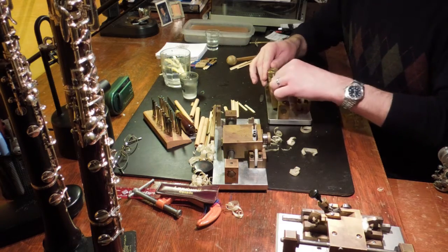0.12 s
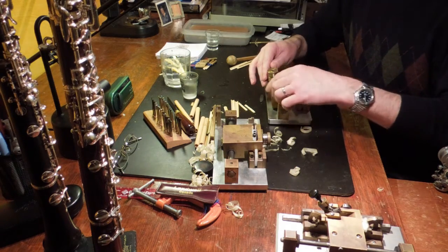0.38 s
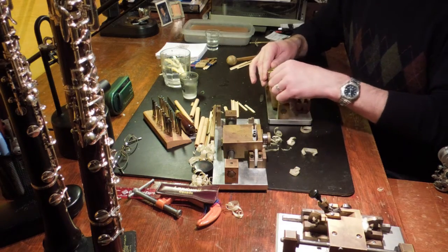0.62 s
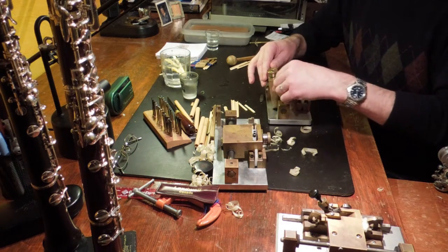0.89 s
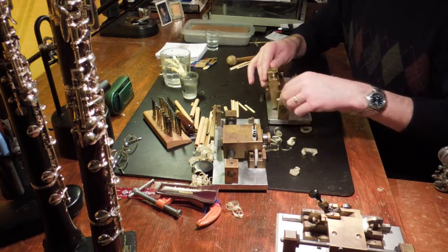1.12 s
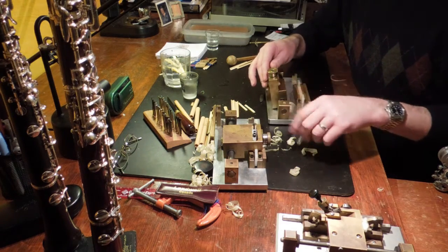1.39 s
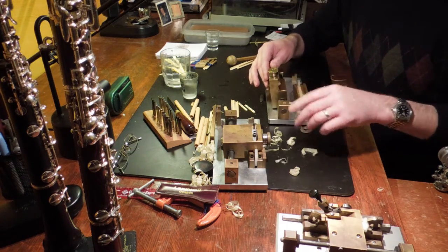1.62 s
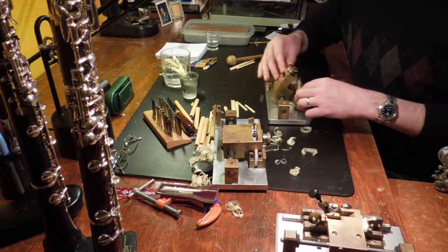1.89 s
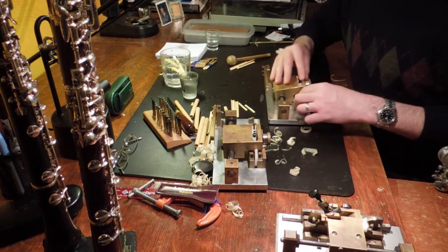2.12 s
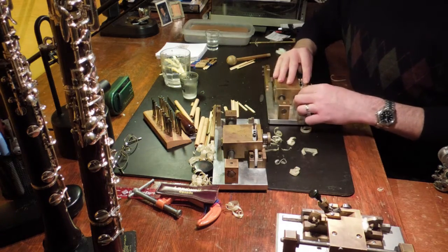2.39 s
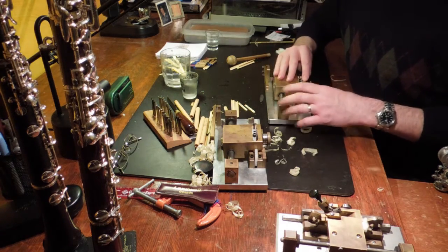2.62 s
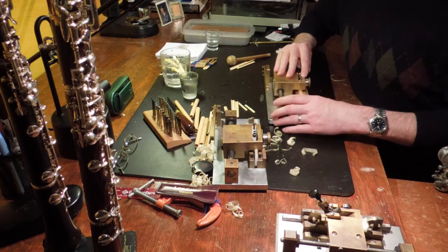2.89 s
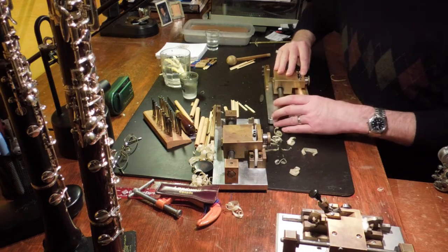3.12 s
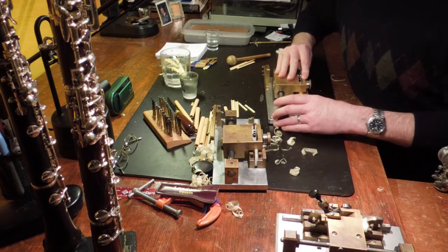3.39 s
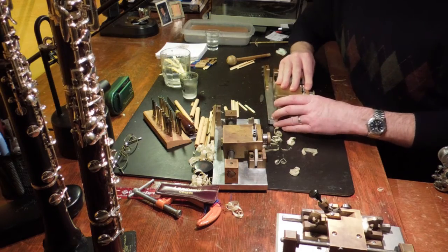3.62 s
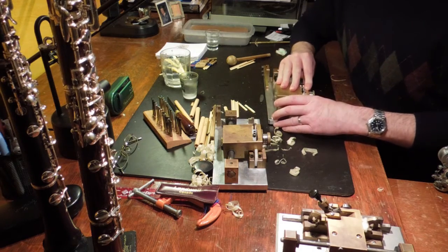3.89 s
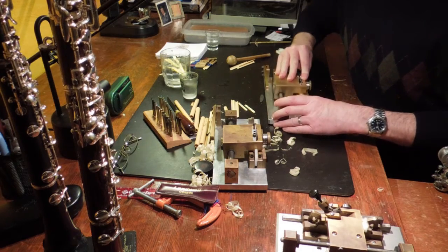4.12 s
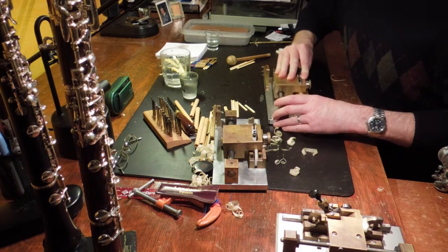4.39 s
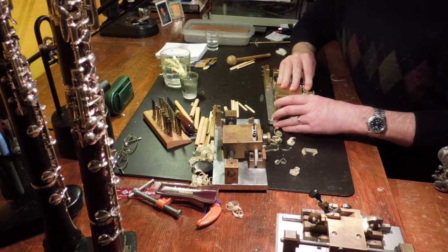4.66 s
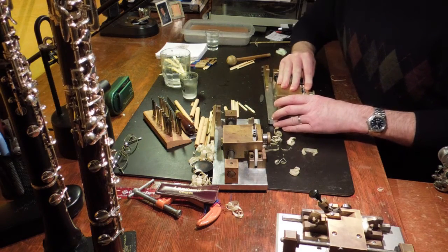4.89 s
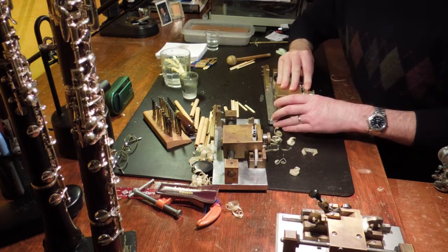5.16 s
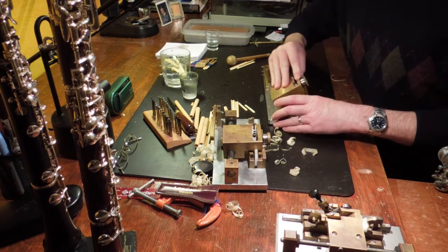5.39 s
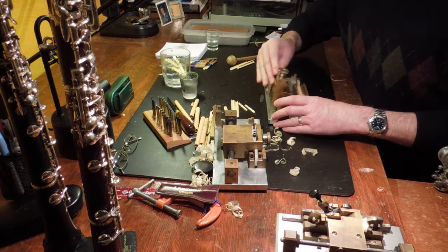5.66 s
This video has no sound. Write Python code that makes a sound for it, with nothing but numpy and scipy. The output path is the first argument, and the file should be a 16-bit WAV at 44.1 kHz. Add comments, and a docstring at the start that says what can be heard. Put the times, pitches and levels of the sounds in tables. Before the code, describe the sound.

Close view of a workbench in a quiet room with low rumble and microphone hiss. Fingers rustle faintly on cane and brass, with dull table bumps and tiny clicks. Then a gouging carriage is pushed three times, each stroke a short hiss with hollow rumble, ending in a sharp click or woody knock. The second ends in a brief piercing squeal. One last loud crack of brass closes the action.

```python
"""A quiet workshop throughout: low room rumble, faint wavering hum tones and microphone hiss. Over it fingers
rustle on cane and brass (bursts of tiny grains), with dull bumps through the table and small brass clicks.
A hand-worked cane gouger follows: its carriage is pushed along its rod three times. It hisses and rumbles
(shaped grains), clicks and knocks (ringing modes), and once squeals (stick-slip overtones).
Nearby surfaces echo the clicks, knocks and squeal, and a dense tail follows them."""
import sys
import numpy as np
from scipy import signal
from scipy.io import wavfile
from scipy.ndimage import uniform_filter1d

SR = 44100
rng = np.random.default_rng(int(sys.argv[2]) if len(sys.argv) > 2 else 0)


def waveform_to_disk(signal):
    """Save audio, clipped to [-1, 1], as 16-bit WAV at the path in sys.argv[1]."""
    frames = np.transpose(np.atleast_2d(signal))
    scaled = np.clip(frames, -1, 1) * 32767
    samples = np.round(scaled).astype(np.int16)
    wavfile.write(sys.argv[1], SR, samples)


def volts(x):
    """Linear amplitude factor 10**(x/20) for a level x in dB, scalar or array-like."""
    e = np.asarray(x, float) / 20
    return 10 ** e


N = 254412  # samples


def rms_one(x):
    """Scale to rms 1."""
    return x / np.sqrt(np.mean(x ** 2) + 1e-20)


def at_hz(points, hz):
    """Read a curve of (f/Hz, value) on a log frequency axis."""
    points_hz, values = np.array(points).T
    return np.interp(np.log(hz), np.log(points_hz), values)


def band(x, low_hz, high_hz):
    """Let through only the pitches between two limits (Butterworth band-pass)."""
    limits = [low_hz, min(high_hz, .48 * SR)]
    return signal.sosfilt(signal.butter(2, limits, "band", fs=SR, output="sos"), x)


def drift(rate_hz):
    """Slow chance of spread 1: smoothed noise, made on every 20th sample and joined by lines."""
    r = np.exp(-40 * np.pi * rate_hz / SR)
    noise = rng.standard_normal(N // 20 + 2002)
    slow = signal.lfilter([1], [1, -2 * r, r * r], noise)[2000:]
    return np.interp(np.arange(N) / 20, np.arange(len(slow)), rms_one(slow))


def ring(force, hz, t60):
    """One vibrating mode: a unit click sets a sine of height 1 ringing, 60 dB weaker after t60 seconds."""
    r, w = volts(-60 / (t60 * SR)), 2 * np.pi * hz / SR
    return signal.lfilter([0, np.sin(w)], [1, -2 * r * np.cos(w), r * r], force + 1e-18)


def stereo(mid, side, alike):
    """Mix two independent noises into left and right with a given likeness (1 = the same)."""
    return np.sqrt(1 + alike) * mid + np.sqrt(1 - alike) * side * [[1], [-1]]


def coloured(spectrum, source, likeness, low_hz):
    """Third-octave bands of a stereo source, each with its level and left-right likeness; rms 1."""
    out, edges = 0, low_hz * 2 ** np.arange(0, np.log2(17000 / low_hz), 1 / 3)
    for k, (low, high) in enumerate(zip(edges, edges[1:])):
        mid, side = band(source[k % 2], low, high)
        centre = np.sqrt(low * high)
        alike = np.clip(at_hz(likeness, centre), 0, 1)
        out = out + volts(at_hz(spectrum, centre)) * stereo(mid, side, alike)
    return rms_one(out)


def grains(per_s, spread_db, shape):
    """Dense uneven clicks at random moments, rms 1."""
    sizes = volts(spread_db * np.minimum(rng.exponential(1, shape), 5)) * rng.choice([-1, 1], shape)
    return rms_one(sizes * (rng.random(shape) < per_s / SR))


# colour of the background noise: (f/Hz, relative level per Hz/dB)
FLOOR_COLOUR = [(12, -33), (20, 2.5), (54, -1.5), (206, -11.5), (270, -4), (328, -28.5), (365, -10),
                (494, -17), (536, -22), (582, -18.5), (832, -22.5), (1610, -24.5), (6150, -30.5),
                (12500, -28), (14000, -28.5)]
# how alike its left and right are: (f/Hz, likeness from 0 to 1)
FLOOR_LIKENESS = [(60, 0.96), (180, 0.91), (540, 0.53), (1630, 0.25), (4920, 0.065), (14800, 0.062)]
# faint tones that waver in level: (f/Hz, typical rms level/dB)
HUM_TONES = [(268, -60), (10740, -70.5), (12182, -74)]


def floor():
    """Room rumble alike in both ears, microphone hiss nearly unrelated, faint tones that waver in level."""
    noise = coloured(FLOOR_COLOUR, rng.standard_normal((2, 2, N)), FLOOR_LIKENESS, low_hz=20.005)
    t = np.arange(N) / SR
    tones = 0
    for hz, level_db in HUM_TONES:
        peak = volts(level_db + 3 + 2 * drift(6))  # a sine peaks 3 dB above its rms
        tones = tones + peak * np.sin(2 * np.pi * hz * t)
    return volts(-45.5) * noise + tones


# colour of rough surfaces rubbing: (f/Hz, relative level per Hz/dB)
HISS_COLOUR = [(2350, -32), (4000, -20.5), (7460, -11.5), (8970, -9), (10100, -19), (13100, 9.5),
               (14000, -5)]


def rubbing_hiss():
    """Rough skin, cane and blade scrape as many tiny grains: a bright hiss, stronger on the right."""
    likeness = [(4000, 1.0), (14000, 0.24)]  # (f/Hz, left-right likeness)
    hiss = coloured(HISS_COLOUR, grains(9000, 2.7, (2, 2, N)), likeness, low_hz=3200)
    return hiss * volts([[-1.2], [1.2]])


# fingers and cane rubbing, one row a brush:
# (peak t/s, treble level/dB, rise t/s, fall t/s, middle band level against treble/dB)
BRUSHES = [(0.306, -53.5, .04, 0.11, -14), (0.448, -54.5, 0.064, .08, -23), (0.80, -51, 0.054, .2, -21),
           (1.001, -39.5, 0.058, 0.068, -11), (1.07, -42.5, 0.032, 0.029, -12),
           (1.43, -48.5, .055, 0.055, -28), (1.514, -44.5, 0.026, .026, -19),
           (1.678, -46.5, .056, 0.027, -19), (2.868, -44, 0.018, 0.17, -29),
           (2.923, -43, 0.011, 0.064, -33)]


def rustling(hiss):
    """Each brush of fingers on cane and brass swells and fades, rounded on top, in treble and middle band."""
    depth_db = 20  # rise and fall times span this much
    t = np.arange(N) / SR
    treble, middle = 0, 0
    for s, peak_db, rise, fall, middle_db in BRUSHES:
        away = np.where(t < s, (s - t) / rise, (t - s) / fall)
        gain = volts(peak_db - depth_db * np.minimum(away ** 1.5, 5))
        treble, middle = treble + gain, middle + volts(middle_db) * gain
    middle_noise = rms_one(band(band(grains(5000, 3.5, N), 2970, 4600), 2600, 10000))
    return treble * hiss + middle * middle_noise


# dull bumps through the table: (t/s, level before softening/dB, f/Hz, t60/s)
BUMPS = [(1.235, -29, 60, 0.043), (2.432, -32, 65, 0.2), (3.099, -39.5, 77.6, 0.4),
         (3.719, -33, 106, 0.095), (4.697, -31, 66.4, 0.22), (5.646, -25, 118, 0.049)]


def thumps():
    """The table top swings at one low pitch per bump; a gentle low-pass softens the start."""
    out = np.zeros(N)
    for s, level_db, hz, t60 in BUMPS:
        force = np.zeros(N)
        force[round(s * SR)] = volts(level_db)
        out += ring(force, hz, t60)
    return signal.lfilter([.04], [1, -.96], out)


# brass on brass, except the row at 3.5364 s, where the blade bites into the cane: (t/s, level/dB, lower modes
# against it/dB, broad crack against it/dB, contact t/s)
BRASS_HITS = [(2.1406, -36, -16, -15, .0005), (2.4256, -27.5, -21, 0, 0.0015), (2.452, -45, -1, 1, .002),
              (2.7407, -38, -19, -30, .003), (2.8043, -34, -19, -15, 0.0028),
              (2.8644, -27.5, -36, -15.5, 0.0014), (2.921, -30, -33, -11, 0.0054),
              (3.1, -53, -13, 9.5, .003), (3.5364, -36, -6, -30, 0.0035), (3.5962, -5, -13, -16.5, 0.00044),
              (3.6958, -36.5, -9, 14, 0.003), (4.2017, -25.5, -23, -7, .004),
              (4.2120, -10.5, -9.5, -31, 0.00042), (4.2152, -11, -36, -7.5, 0.00071),
              (4.282, -26, -7, -5.5, .006), (4.344, -20, -11, -11.5, 0.0037),
              (4.5797, -8, -10, -18.5, 0.00028), (4.6832, -38, -3, 12, 0.0019),
              (5.4022, -6, -22, -20, 0.00066), (5.4049, -0.5, -23, -7, 0.0018),
              (5.4097, -11, -34, -32, 0.0028)]
# modes of the small brass parts: (f/Hz, relative level before chance/dB, t60/s)
BRASS_MODES = [(4100, -36, .004), (5100, -44, 0.012), (6460, 28, 0.0016), (8400, 16, 0.00083),
               (10040, -24, 0.0025), (12100, 21, 0.015), (12030, 25.5, 0.0008), (14600, -5, 0.0087)]


def clicks():
    """Each contact is a short crackle of micro-hits into the fast brass modes; small parts radiate no bass."""
    out = np.zeros(N)
    upper = np.array(BRASS_MODES)[:, 0] > 7000
    draws = rng.standard_normal((len(BRASS_HITS), 800 + len(BRASS_MODES)))
    for (s, level_db, lower_db, crack_db, contact), draw in zip(BRASS_HITS, draws):
        fading = np.exp(-np.arange(800) / (max(contact, 5e-5) * SR))
        force = np.zeros(1600)
        force[:800] = draw[:800] * fading
        rings = []
        for k, ((hz, mode_db, t60), chance) in enumerate(zip(BRASS_MODES, draw[800:])):
            strength = (-1) ** k * volts(mode_db + 0.5 * chance)
            rings.append(strength * rms_one(ring(force, hz, t60)))
        rings = np.array(rings)
        upper_part = band(band(rings[upper].sum(axis=0), 7000, 18000), 6000, 20000)
        lower_part = band(rings[~upper].sum(axis=0), 3300, 7500)
        crack = band(force, 1000, 10000)
        energy = np.sqrt((np.sum(fading ** 2) + 10) / 1600 / 2)  # grows with the length of the contact
        at = round(s * SR)
        for part, part_db in zip((upper_part, lower_part, crack), (0, lower_db, crack_db)):
            out[at:at + 1600] += volts(level_db + part_db) * energy * rms_one(part)
    return out


# single echoes: (delay t/s, left level/dB, right level/dB)
NEAR_ECHOES = [(.0035, -5, -5), (.0052, -9, -9), (.0108, -11, -11), (.0146, -16, -15), (.021, -21, -20)]
# the workshop's dense tail: (f/Hz, t60/s, starting level/dB)
WORKSHOP_TAIL = [(300, 0.33, -30.5), (1105, 0.22, -31.5), (3220, 0.21, -27), (7000, 0.19, -28),
                 (11500, 0.17, -30.5)]


def room(x):
    """Single echoes from bench, body and wall, then a dense tail that dies band by band."""
    out = np.zeros((2, N))
    for s, left_db, right_db in NEAR_ECHOES:
        lag = round(s * SR)
        for side, level_db in enumerate((left_db, right_db)):
            out[side, lag:] += volts(level_db) * x[side, :-lag]
    t = np.arange(SR // 2) / SR
    hz = np.array(WORKSHOP_TAIL)[:, 0]
    edges = [100, *np.sqrt(hz[1:] * hz[:-1]), 18000]
    mid, side = rng.standard_normal((2, len(t)))
    alike = 0.98  # left and right are almost the same
    scatter = np.sqrt(alike) * mid + np.sqrt(1 - alike) * side * [[1], [-1]]
    scatter = scatter * (1 - np.exp(-t / 0.0046))  # the tail builds up over a few milliseconds
    tail = 0
    for (_, t60, level_db), low, high in zip(WORKSHOP_TAIL, edges, edges[1:]):
        tail = tail + volts(level_db - 60 * t / t60) * band(scatter, low, high)
    return out + signal.fftconvolve(x.mean(axis=0, keepdims=True), tail, axes=1)[:, :N]


# blows that reach the base and bench: (t/s, level/dB, contact t/s, settling t/s)
BLOWS = [(2.4265, -35, 0.00063, 0.0033), (2.701, -54, 0.000038, 0.0027), (3.092, -53, 0.00029, 0.0014),
         (3.099, -32.5, 0.00099, 0.0051), (3.697, -15.5, 0.000016, 0.0031),
         (4.285, -39.5, 0.000049, 0.00186), (4.344, -32.5, 0.00037, 0.00364),
         (4.683, -19, 0.000035, 0.0027), (5.4049, -26.5, 0.000026, .003)]
# modes of the base: (f/Hz, relative level before chance/dB, t60/s)
BASE_MODES = [(166, -5.5, 0.088), (294.3, -16.5, 0.29), (466, -6, 0.11), (570, -25, 0.0047),
              (798, 2.5, 0.07), (901, 6, 0.072), (1120, 16.5, 0.01), (1300, 15.5, 0.019),
              (1435, 11.5, 0.06), (1595, 3.5, 0.068), (2144, 7.5, 0.027), (2360, -11, 0.018),
              (2670, -8, 0.024), (3170, -3, 0.034), (3500, -24, .02)]


def knocks():
    """A blow lands as a few uneven jolts and rings the base; softer contact leaves the upper modes out."""
    out = np.zeros(N)
    draws = rng.standard_normal((len(BLOWS), 6 + len(BASE_MODES)))
    for (s, level_db, contact, settling), draw in zip(BLOWS, draws):
        jolts_s = settling * np.cumsum(np.abs(draw[:6])) * .5 * (np.arange(6) > 0)
        rise = np.maximum(np.arange(9000) / SR - jolts_s[:, None], 0) / max(contact, 2e-5)
        force = volts(-6 * np.arange(6)) @ (rise * np.exp(-rise))  # each jolt 6 dB weaker
        sound = 0
        for (hz, mode_db, t60), chance in zip(BASE_MODES, draw[6:]):
            sound = sound + volts(mode_db + 1.5 * chance) * ring(force, hz, t60)
        sound = band(sound, 225, 12500)  # a small base radiates no deep bass
        at = round(s * SR)
        out[at:at + 9000] += volts(level_db) * sound / (2 * np.std(sound[:600]))
    return out


# carriage pushed along its rod, and at last lifted off:
# (start t/s, blade bites t/s, stop t/s, hiss level at the bite/dB, rumble level at the bite/dB)
PUSHES = [(3.40, 3.535, 3.697, -40, -48), (4.09, 4.132, 4.30, -40, -49), (4.46, 4.533, 4.684, -43, -47.5),
          (5.335, 5.352, 5.402, -46, -62)]
# hiss and rumble dying away after the hard stops: (t/s, hiss level/dB, rumble level/dB)
DYING_AWAY = [(3.697, -36.5, -33), (4.684, -42.5, -37), (5.409, -26.5, -42)]


def stroke_gain(column, shape_db, dies_db_per_s):
    """Gain of one layer: climbs, steps up at the bite, swells in the last shove, dies after hard stops."""
    bite_s, shove_s = 0.0062, 0.0335
    t, out = np.arange(N) / SR, np.zeros(N)
    start_db, before_db, way_db, shove_db = shape_db
    curve_db = [start_db, before_db, 0, way_db, shove_db]
    for start, bite, stop, *level_db in PUSHES:
        on = slice(round(start * SR), round(stop * SR))
        knots = [start, bite - bite_s, bite, stop - shove_s, stop - shove_s / 2]
        knots = np.maximum.accumulate(knots)  # keeps the times in order in a short stroke
        out[on] += volts(level_db[column] + np.interp(t[on], knots, curve_db))
    for s, *level_db in DYING_AWAY:
        on = slice(round(s * SR), N)
        out[on] += volts(level_db[column] - dies_db_per_s * (t[on] - s))
    return uniform_filter1d(out, size=200)


# hiss against its level at the bite:
# (start level/dB, just before the bite level/dB, on the way level/dB, last shove level/dB)
HISS_CURVE = (-18.5, -5, 1.5, 6)


def carriage_hiss(hiss):
    """The blade scrapes cane: the rubbing hiss follows each push."""
    return stroke_gain(0, HISS_CURVE, dies_db_per_s=139) * hiss


# rumble against its level at the bite:
# (start level/dB, just before the bite level/dB, on the way level/dB, last shove level/dB)
RUMBLE_CURVE = (-15, -1, 0.4, 3)
# broad humps of the rumble: (f/Hz before the pitch moves, width f/Hz, relative level/dB)
RUMBLE_HUMPS = [(904, 122, 3), (1152, 170, 2.5), (1445, 410, -1.5), (1994, 300, -2), (561, 420, -5)]


def carriage_rumble():
    """The base rumbles under the carriage: low-passed grains shifted up to a few wandering pitches."""
    gain = stroke_gain(1, RUMBLE_CURVE, dies_db_per_s=250)
    level_db = np.clip(20 * np.log10(gain + 1e-9), -66, -40)
    pitch = 1 + 0.013 * (level_db + 44.5) + .03 * drift(12)  # a faster stroke is louder and rumbles higher
    rumble = 0
    for hz, width, hump_db in RUMBLE_HUMPS:
        low_pass = signal.butter(2, width / 2, fs=SR, output="sos")
        rough = signal.sosfilt(low_pass, grains(1200, 3.8, (2, N)))
        phase = 2 * np.pi * hz * np.cumsum(pitch) / SR
        rumble = rumble + volts(hump_db) * rms_one(rough[0] * np.cos(phase) + rough[1] * np.sin(phase))
    return gain * rms_one(rumble)


# blade skating on cane, stick and slip: (t/s, slips per second before wavering f/Hz, level/dB)
SLIPS = [(4.2995, 4450, -45), (4.302, 4280, -15), (4.306, 4090, -9), (4.311, 4040, -8), (4.318, 4110, -5),
         (4.330, 4410, -11), (4.342, 4690, -14), (4.351, 4780, -21), (4.357, 4800, -45)]
# (multiple of the slip rate, right level/dB, left level against right/dB, left lead/rad)
SLIP_OVERTONES = [(1, -25, 0, .3), (2, -7.5, -1, 1.2), (2.5, -32, -2, 1.0), (3, 0, -6.5, 1.4)]


def squeal():
    """Regular slips give near-sine overtones; each wavers in strength, and beams unevenly to the two sides."""
    s, per_s, points_db = np.transpose(SLIPS)
    t = np.arange(N) / SR
    slip_hz = np.interp(t, s, per_s) * (1 + 0.0072 * drift(294))
    phase = 2 * np.pi * np.cumsum(slip_hz) / SR
    level = volts(np.interp(t, s, points_db, left=-140, right=-140))
    tones = 0
    for k, right_db, left_db, lead in SLIP_OVERTONES:
        # part of the wavering is shared, part is separate on each side
        wobble_db = 3.2 * drift(240) + 1.2 * np.array([drift(240), drift(240)])
        strength = volts(right_db + wobble_db + np.array([[left_db], [0]]))
        tones = tones + strength * np.sin(k * phase + np.array([[lead], [0]]))
    # fibres tear under the skating blade
    scrape = volts(-34.5) * rms_one(band(grains(7300, 2.7, N), 1200, 25000))
    # missed slips blur the lowest tone
    chatter = volts(-35) * rms_one(band(rng.standard_normal(N), 4300, 4700))
    return level * (tones + scrape + chatter)


def scene():
    """The machine stands a little to the right; the squeal beams and stirs the room less than the blows."""
    struck = clicks() * volts([[-1.2], [1.2]]) + knocks()
    squealing = squeal()
    echoing = room(struck + volts(-2) * squealing)
    hiss = rubbing_hiss()
    flutter = volts(1.5 * drift(60))  # the grip is never even
    rubbing = flutter * (rustling(hiss) + carriage_hiss(hiss)) + carriage_rumble()
    return floor() + rubbing + thumps() + struck + squealing + echoing


def top_cut(x):
    """Nothing passes above the cut-off."""
    return signal.sosfilt(signal.butter(12, 15400, fs=SR, output="sos"), x)


def record(dry):
    """Small microphones lose the deepest bass; the top is cut steeply, peaks clip."""
    cut = signal.sosfilt(signal.cheby2(18, 50, 14500, fs=SR, output="sos"), dry)
    cut = signal.sosfilt(signal.butter(2, 26, "high", fs=SR, output="sos"), cut)
    mix = np.clip(cut, -1, 1)
    return top_cut(mix)


dry = scene()
out = record(dry)
waveform_to_disk(out)
```